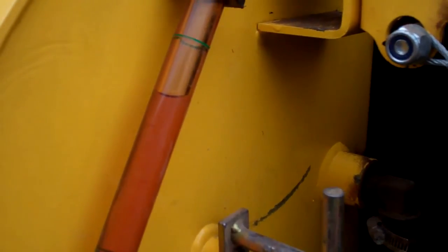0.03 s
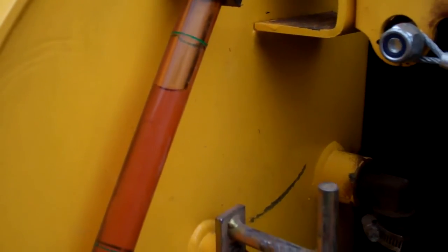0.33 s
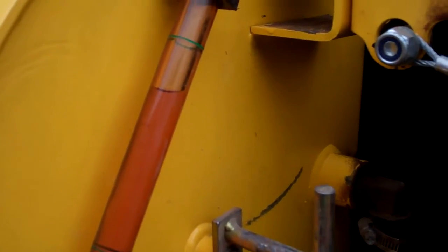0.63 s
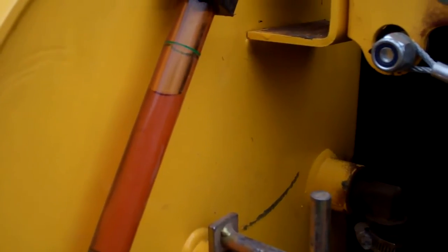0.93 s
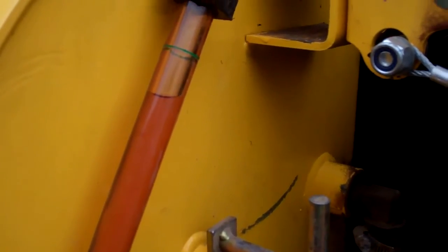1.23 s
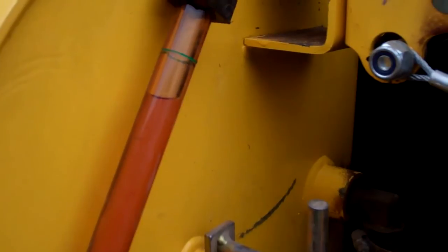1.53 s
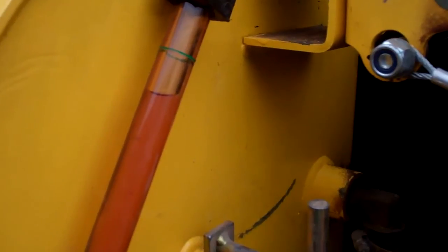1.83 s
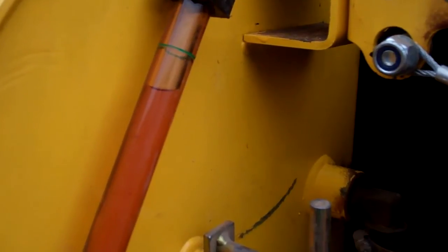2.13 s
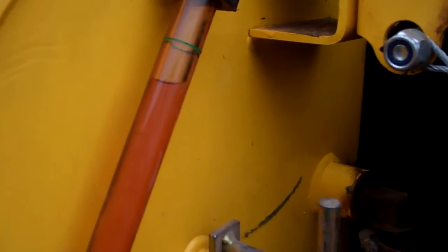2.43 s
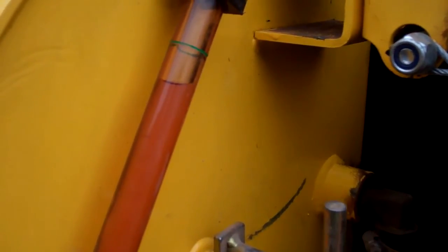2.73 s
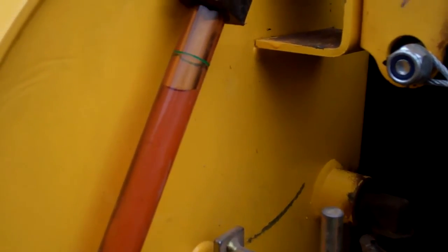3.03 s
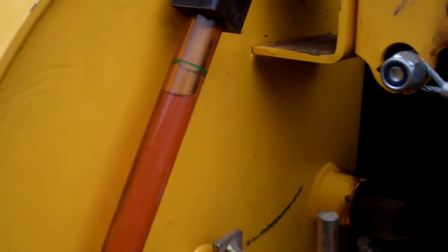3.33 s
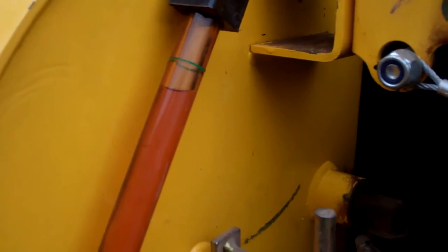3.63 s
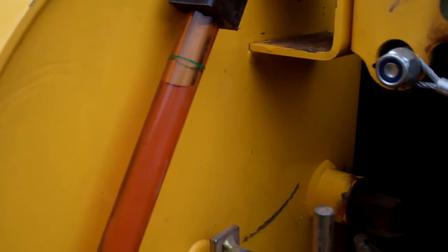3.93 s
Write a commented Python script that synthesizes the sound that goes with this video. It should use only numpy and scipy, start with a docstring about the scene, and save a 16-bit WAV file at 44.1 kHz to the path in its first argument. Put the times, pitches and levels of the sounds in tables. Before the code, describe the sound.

An excavator's motor and pump drone steadily, a buzzing hum with fast pulsing hiss over a rushing noise. Dull handling bumps touch the close, hand-held microphone at the start and more softly later on.

```python
"""An excavator's motor and pump drone at nearly constant speed, close to a hand-held camera.
From the start, five strokes a revolution drive the steel body: low orders hum, higher ones buzz,
each stroke spits hiss, and a resonance growls over a turbulent rush. In the first 0.4 s the hand
bumps the camera in a quick cluster. The strongest tones swell and fade as speed and position drift.
Softer bumps follow from 2.3 to 3.5 s; the drone runs on to 4 s."""
import sys
import numpy as np
from scipy import signal
from scipy.fft import rfft, irfft, next_fast_len
from scipy.io import wavfile
from scipy.ndimage import uniform_filter1d, map_coordinates

SR = 44100
rng = np.random.default_rng(int(sys.argv[2]) if len(sys.argv) > 2 else 0)


def store_wav(level_fs):
    """Save 16-bit WAV to argv[1]."""
    pcm = np.round(np.clip(np.atleast_2d(level_fs), -1, 1) * 32767)
    wavfile.write(sys.argv[1], SR, pcm.T.astype(np.int16))


N = 176400

# shaft speed: (time [s], speed [rev/s])
SHAFT_HZ = [(0.0, 40.72), (0.28, 40.8), (0.45, 41.06), (0.65, 41.2), (0.87, 41.13), (1.02, 40.99),
            (1.27, 40.91), (1.47, 41.4), (1.68, 40.77), (1.9, 40.7), (2.05, 40.96), (2.77, 41.07),
            (3.08, 40.93), (3.2, 40.7), (3.44, 40.56), (3.63, 41.04), (3.9, 40.63), (4.0, 40.77)]
# steady body tones: (shaft order, level [dB rms])
STEADY_ORDERS_DB = [(8, -43), (9, -46), (10, -38.5), (13, -48), (14, -41), (16, -40), (21, -44), (23, -43),
                    (24, -35.5), (25, -44), (26, -48), (28, -39), (30, -41), (31, -45), (32, -50),
                    (35, -37.5), (36, -48), (37, -47), (40, -50), (41, -44), (43, -50), (44, -50),
                    (45, -45), (47, -48), (50, -49), (58, -50), (60, -48), (65, -51), (75, -52)]
# swelling body tones: shaft order -> (time [s], level [dB rms])
SWELLING_ORDERS_DB = { 5: [(0, -35.5), (.35, -35), (.6, -42), (.95, -45), (1.55, -35), (1.65, -49),
                      (1.75, -36.5), (2, -37), (2.55, -42), (3.1, -42), (3.28, -35), (3.55, -36),
                      (3.75, -43), (3.93, -36)], 15: [(0, -34.5), (.6, -40.5), (1.55, -40), (1.7, -36.5)],
                      17: [(0, -37.5), (1.5, -47), (3.4, -37.5)], 18: [(.2, -40), (.4, -33), (1.5, -34),
                      (1.85, -41), (2.1, -35), (2.75, -31), (3.05, -34), (3.2, -43), (3.6, -38)],
                      19: [(.3, -31), (.65, -40), (1.2, -32.5), (1.42, -43), (1.67, -27.5), (2.8, -36),
                      (3.15, -27), (3.45, -26.5), (3.62, -32), (3.8, -27.5)], 20: [(0, -30), (.55, -26.5),
                      (1, -27), (1.8, -30), (3, -30.3), (3.5, -32.7)], 22: [(0, -36), (.95, -33),
                      (1.9, -37.5), (2.1, -32.5), (3.4, -41), (3.7, -34.5), (3.99, -42)], 27: [(0, -42),
                      (.4, -27.5), (.65, -30.5), (2.85, -32.5), (3.4, -35), (3.99, -33.5)], 55: [(0, -36.5),
                      (.3, -37.5), (.42, -46), (.72, -39.5), (1.05, -44.5), (1.65, -43), (1.78, -36),
                      (2.2, -44), (3.08, -47), (3.2, -40), (3.47, -38.5), (3.56, -45), (3.9, -40)],
                      70: [(.1, -49), (.6, -40.5), (1.15, -45), (1.55, -42.5), (1.78, -48), (2.2, -44.5),
                      (3.1, -45), (3.43, -56), (3.57, -44), (4, -51)]}
# group delay of the body, smears each revolution into a sweep: (frequency [Hz], delay [s])
BODY_DELAY_S = [(345, .063), (500, .047), (690, .05), (750, .0405), (880, .037), (960, .027), (1080, .032),
                (1130, .022), (2600, .11)]
# balance of body tones: (frequency [Hz], left minus right [dB])
BODY_BALANCE_DB = [(200, 0.5), (400, -5), (600, -1), (800, -5.5), (950, -1), (1150, -.5), (1450, -2),
                   (3000, -2.5)]
# weak orders: (frequency [Hz], level per order [dB rms])
BUZZ_DB = [(125, -71), (500, -51.5), (1350, -72), (1800, -55.5), (2400, -56), (2750, -61), (3400, -54.5),
           (4000, -63), (4900, -54.5), (6500, -64), (8600, -60.5)]
# stereo spread of the buzz: (frequency [Hz], share unrelated between channels)
BUZZ_SPREAD = [(1000, 0.72), (4000, 0.22), (6000, 0.8)]
# hiss spectrum: (frequency [Hz], relative density [dB])
HISS_SPECTRUM_DB = [(800, -31), (2000, -7.5), (3200, -12), (4900, -7.5), (6300, -8), (9000, -8.5),
                    (10500, -3.5), (12000, -2), (13500, 2)]
# hiss image: (frequency [Hz], left-right correlation)
HISS_CORRELATION = [(4000, 0.86), (5200, -0.074), (7800, -0.076), (10700, 0.13), (13000, -0.12)]
# hiss resonances: (frequency [Hz], boost [dB])
HISS_PEAKS_DB = [(3900, 3), (5950, 3), (10200, 2), (10850, 2.5), (12800, 2.5), (14050, 3)]
# hiss envelope: (time [s], level [dB rms])
HISS_LEVEL_DB = [(2.2, -24.2), (2.35, -25.5), (2.8, -22.6), (3.3, -23.7)]
# rush spectrum: (frequency [Hz], relative density [dB])
RUSH_SPECTRUM_DB = [(25, -40), (60, -16.5), (110, -13), (300, -13), (580, -16.5), (680, -4), (930, -7.5),
                    (1120, -2.5), (1330, -8.5), (1850, -9), (2100, -17), (2350, -8.5), (2750, -16),
                    (4000, -18), (15000, -33)]
# rush image: (frequency [Hz], left-right correlation)
RUSH_CORRELATION = [(150, 0.29), (400, 0.65), (2200, 0.19), (4000, 0.95)]
# hand bumps: (time [s], peak gain [dB], pitch [Hz])
HAND_BUMPS = [(.056, -27, 170), (.079, -31, 100), (.096, -25, 210), (.112, -26, 240), (.138, -31, 140),
              (.3, -32, 150), (.354, -33, 120), (2.295, -40, 130), (2.975, -39, 110), (3.086, -37, 130),
              (3.17, -41, 90), (3.464, -34, 130), (3.51, -39, 120)]
# rustle in a bump: (frequency [Hz], relative density [dB])
RUSTLE_SPECTRUM_DB = [(25, -20), (90, -10), (280, -1), (600, -37)]
# rustle image: (frequency [Hz], left-right correlation)
RUSTLE_CORRELATION = [(100, -0.13)]

STROKES_PER_REV = 5


def amp(db):
    """Decibels to gain."""
    return 10 ** (np.asarray(db) / 20)


def unit_rms(x):
    """Scale to rms 1."""
    return x / np.sqrt(np.mean(x ** 2) + 1e-20)


def at_hz(rows, hz):
    """Interpolate (frequency [Hz], value) rows on a log axis."""
    knots_hz, values = np.transpose(rows)
    return np.interp(np.log(hz + 1), np.log(knots_hz + 1), values)


def curve(rows):
    """Interpolate (time [s], value) rows per sample."""
    return np.interp(np.arange(N) / SR, *np.transpose(rows))


def wobble(knots_per_s):
    """Smooth random curve."""
    grid_s = np.linspace(0, N / SR, 400)
    slow = map_coordinates(rng.standard_normal(256), [grid_s * knots_per_s], mode="wrap")
    return np.interp(np.arange(N) / SR, grid_s, slow)


def filtered(x, response):
    """Apply the gain response(hz)."""
    size = next_fast_len(N + SR // 2)
    return irfft(rfft(x, size) * response(np.fft.rfftfreq(size, 1 / SR)), size)[..., :N]


def noise(spectrum_db, correlation):
    """Coloured stereo noise, rms 1."""
    def response(hz):
        width_rad = np.arccos(at_hz(correlation, hz)) / 2
        return amp(at_hz(spectrum_db, hz)) * [np.cos(width_rad), np.sin(width_rad)]
    mid, side = filtered(rng.standard_normal((2, N)), response)
    return unit_rms(np.array([mid + side, mid - side]))


def tone(phase_rad):
    """Sine, rms 1."""
    return np.sqrt(2) * np.sin(phase_rad)


def body_pan(hz):
    """Left and right gains of a body tone."""
    return amp(at_hz(BODY_BALANCE_DB, hz) * np.array([[.5], [-.5]]))


def body_hum(revs, mean_hz, wander_db=1.5, wander_rad=.27, knots_per_s=4.5):
    """Strong shaft orders, each drifting a little and delayed by the steel body."""
    levels = [(order, db + wander_db * wobble(knots_per_s)) for order, db in STEADY_ORDERS_DB]
    levels += [(order, curve(rows)) for order, rows in SWELLING_ORDERS_DB.items()]
    between_orders_hz = abs(np.arange(100) - .5) * mean_hz
    lag_cycles = np.cumsum(at_hz(BODY_DELAY_S, between_orders_hz)) * mean_hz
    out = np.zeros((2, N))
    for order, db in levels:
        phase_rad = 2 * np.pi * (order * revs - lag_cycles[order]) + wander_rad * wobble(knots_per_s)
        out += amp(db) * tone(phase_rad) * body_pan(order * mean_hz)
    return out


def body_buzz(revs, mean_hz, decay_s=.003, drift=.69, orders=210, size=4096, shapes=12):
    """Weak orders: each stroke knocks the body; the rattle repeats every revolution and slowly morphs."""
    order_hz = np.arange(orders) * mean_hz
    stroke_phase = np.arange(size) * STROKES_PER_REV / size % 1
    knocks = np.exp(-stroke_phase / (STROKES_PER_REV * mean_hz * decay_s))
    rattle = rng.standard_normal((3, 1, size)) + drift * rng.standard_normal((3, shapes, size))
    spectra = rfft(rattle * knocks)[..., :orders]  # common, left, right
    spread = at_hz(BUZZ_SPREAD, order_hz)
    spectra = np.sqrt(1 - spread) * spectra[0] + np.sqrt(spread) * spectra[1:]
    flattened = unit_rms(abs(spectra) ** .5) * np.exp(1j * np.angle(spectra))
    spectra = flattened * amp(at_hz(BUZZ_DB, order_hz))
    hum_orders = [order for order, _ in STEADY_ORDERS_DB] + list(SWELLING_ORDERS_DB)
    spectra[..., [0] + hum_orders] = 0
    wavetables = irfft(spectra, size) * size / np.sqrt(2)
    position = [np.linspace(0, shapes - 1, N), revs % 1 * size]
    return np.array([map_coordinates(side, position, order=1, mode="grid-wrap") for side in wavetables])


def patchy(x, depth_db):
    """Drift the colour in narrow, long-lived patches."""
    spectra = signal.stft(x, nperseg=1024)[2]
    field = uniform_filter1d(rng.standard_normal(spectra.shape[1:]), size=4, axis=0)
    field = uniform_filter1d(field, size=90, axis=1)
    return signal.istft(spectra * amp(depth_db * unit_rms(field)), nperseg=1024)[1][:, :N]


def stroke_hiss(revs, mean_hz, decay_s=.0028, spit_db=4.5, scatter_db=1.5, lag_strokes=.34):
    """Resonant hiss that flares at every stroke."""
    def resonances(hz, width_hz=220):
        return amp(sum(db * np.exp(-((hz - peak_hz) / width_hz) ** 2) for peak_hz, db in HISS_PEAKS_DB))
    strokes = revs * STROKES_PER_REV - lag_strokes + 1
    strength = amp(spit_db + scatter_db * rng.standard_normal(1024))[strokes.astype(int)]
    flare = 1 + strength * np.exp(-(strokes % 1) / (STROKES_PER_REV * mean_hz * decay_s))
    jet = filtered(noise(HISS_SPECTRUM_DB, HISS_CORRELATION), resonances)
    return amp(curve(HISS_LEVEL_DB)) * unit_rms(flare * patchy(jet, depth_db=1.7))


def body_growl(shaft_hz, centre_hz=715, half_width_hz=60, base_db=-42, db_per_hz=13):
    """Narrow noise in the body's main resonance, louder as the shaft speeds up."""
    rough = filtered(rng.standard_normal(N), lambda hz: 1 / (1 + ((hz - centre_hz) / half_width_hz) ** 2))
    level_db = base_db + db_per_hz * (shaft_hz - shaft_hz.mean())
    return amp(level_db) * unit_rms(rough) * body_pan(centre_hz)


def machine_rush(level_db=-32.5):
    """Steady broadband turbulence."""
    return amp(level_db) * noise(RUSH_SPECTRUM_DB, RUSH_CORRELATION)


def hand_bumps(rise_s=.0055, rustle_db=-1):
    """Dull thuds of the hand on the camera case: a few low cycles plus rustle."""
    rustle = amp(rustle_db) * noise(RUSTLE_SPECTRUM_DB, RUSTLE_CORRELATION)
    out = np.zeros((2, N))
    for start_s, db, hz in HAND_BUMPS:
        age_s = np.maximum(np.arange(N) / SR - start_s, 0)
        envelope = age_s / rise_s * np.exp(1 - age_s / rise_s)
        out += amp(db) * envelope * (tone(2 * np.pi * hz * age_s) + rustle)
    return out


def scene(flutter_revs=.00077):
    """One shaft drives hum, buzz, hiss and growl; rush and bumps add to them."""
    shaft_hz = curve(SHAFT_HZ)
    mean_hz = shaft_hz.mean()
    revs = np.cumsum(shaft_hz) / SR + flutter_revs * wobble(knots_per_s=25)
    drone = body_hum(revs, mean_hz) + body_buzz(revs, mean_hz) + stroke_hiss(revs, mean_hz)
    return drone + body_growl(shaft_hz) + machine_rush() + hand_bumps()


def record(dry):
    """Camera band limit: brick-wall low-pass."""
    return filtered(dry, lambda hz: hz < 14280)


dry = scene()
out = record(dry)
store_wav(out)
```